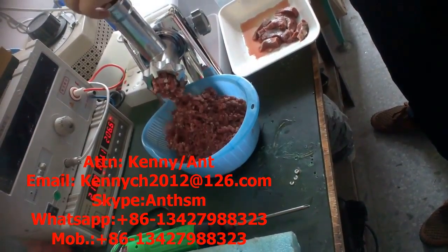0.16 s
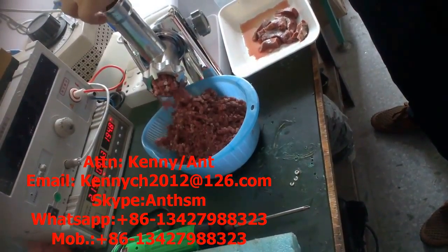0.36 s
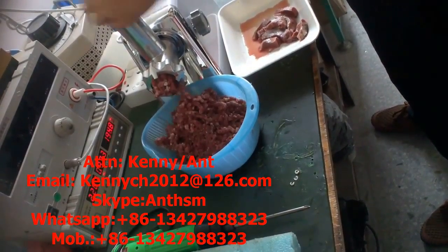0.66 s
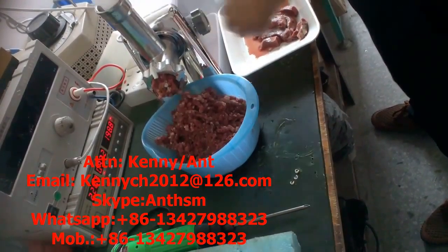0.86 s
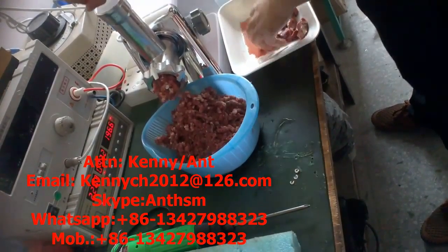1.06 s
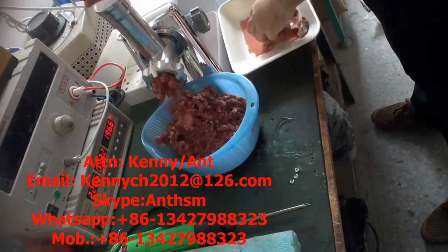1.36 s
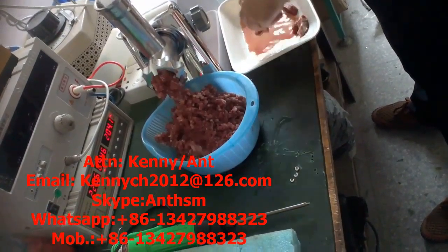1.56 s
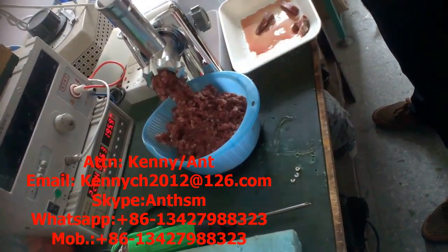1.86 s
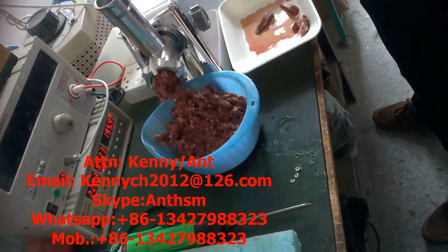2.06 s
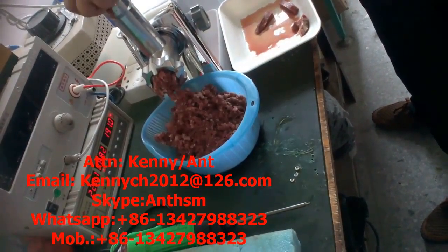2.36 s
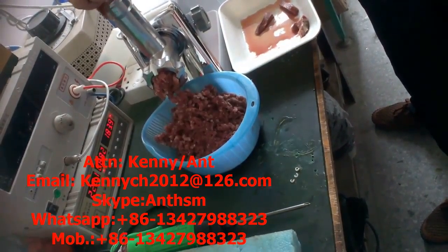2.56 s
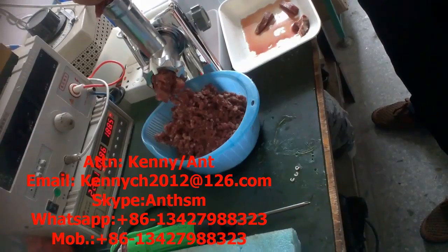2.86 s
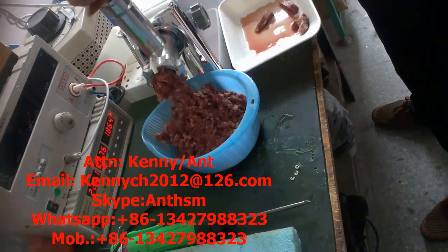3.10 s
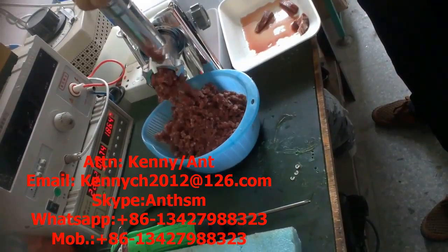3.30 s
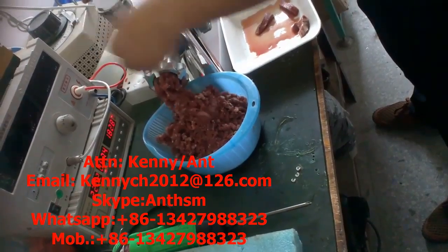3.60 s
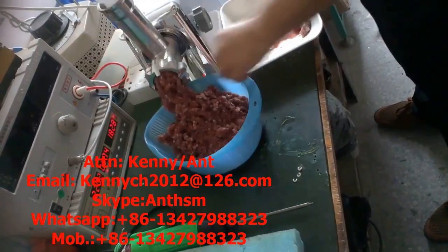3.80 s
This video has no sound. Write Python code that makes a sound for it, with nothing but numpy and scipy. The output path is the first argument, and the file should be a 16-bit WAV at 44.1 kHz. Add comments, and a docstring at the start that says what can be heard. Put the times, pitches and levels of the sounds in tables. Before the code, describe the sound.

An electric meat grinder drones and whirs steadily up close, with buzzy gear whine and metallic rattle.

```python
"""An electric meat grinder runs close to a small mono microphone in a workshop.
The motor speed sags and recovers with the load; shaft, gear and armature tones with sidebands ride on it.
Random tooth impacts ring the housing as rattle; decaying rings and noise bursts make ticks, plops, thuds
and thumps, and one double snap cracks. Filtered noise gives casing rumble and fan hiss, over mains hum."""
import sys
import numpy as np
from scipy import signal
from scipy.fft import rfft, irfft
from scipy.io import wavfile
from scipy.ndimage import uniform_filter1d

SR = 44100
rng = np.random.default_rng(int(sys.argv[2]) if len(sys.argv) > 2 else 0)


def log_audio(samples):
    """Write samples as a 16-bit WAV file to the path given in sys.argv[1]."""
    # one column per channel
    frames = np.atleast_2d(samples).T
    # limit to full scale, then quantise
    limited = np.clip(frames, -1, 1)
    pcm = np.round(limited * 32767).astype(np.int16)
    wavfile.write(sys.argv[1], SR, pcm)


def natural_amplitude(level_db):
    """Convert a level in decibels to a linear amplitude factor, elementwise."""
    exponent = np.asarray(level_db, float) / 20
    return 10 ** exponent


N = 173754

PINION_TEETH, WHEEL_TEETH = 7, 54
WHEEL_RATIO = PINION_TEETH / WHEEL_TEETH  # wheel turns per shaft turn
MAINS_HZ = 50
WHEEL_THROB_DB = 2  # throb once a wheel turn


def col(table, k):
    """Column k of a curve table at every sample."""
    a = np.array(table, float)
    return np.interp(np.arange(N) / SR, a[:, 0], a[:, k])


def walk(rate):
    """Smooth random wander, about rate turns a second, spread 1."""
    k = np.arange(int(N / SR * rate) + 3)
    steps = np.interp(np.arange(N) * rate / SR, k, rng.standard_normal(len(k)))
    w = uniform_filter1d(steps, int(SR / rate))
    return w / w.std()


def tone(turns, db, wobble_db, blur=0.28):
    """A sine on a running count of turns, wavering and fluttering in level, blurred in phase (radians)."""
    wobble = 0.76 * walk(8.99) + 0.8 * walk(23.965)
    level = np.sqrt(2) * natural_amplitude(db + wobble_db * wobble)
    return level * np.sin(2 * np.pi * (turns + rng.random()) + blur * walk(30))


def ring(x, hz, width):
    """Two-pole resonance, gain 1 at the centre."""
    return signal.lfilter(*signal.iirpeak(hz, hz / width, SR), x)


def strikes(table, ring_db, spray_db, rise_s, spread):
    """Each row: a decaying ring at its pitch with a spray of noise around it."""
    out, t = np.zeros(N + SR), np.arange(SR // 3) / SR
    for s, db, hz, t60 in table:
        fall = np.exp(-np.log(1000) * t / t60) * np.minimum(t / rise_s, 1)
        spray = ring(ring(rng.standard_normal(len(t)), hz, spread * hz), hz, spread * hz)
        body = natural_amplitude(ring_db) * np.sin(2 * np.pi * hz * t) + natural_amplitude(spray_db) * spray / spray.std()
        i = int(s * SR)
        out[i:i + len(t)] += natural_amplitude(db) * fall * body
    return out[:N]


# Motor speed under load. Each row: time in seconds, shaft speed in Hz.
MOTOR_SPEED = [(0, 202), (.12, 203), (.23, 206.8), (.33, 205), (.46, 201.8), (.6, 202.1), (.8, 203.6),
               (.93, 204.1), (1.05, 203.3), (1.25, 203), (1.39, 198.3), (1.5, 193.4), (1.56, 194),
               (1.65, 198.5), (1.76, 203), (1.86, 203.6), (1.97, 201.7), (2.08, 204), (2.2, 209.5),
               (2.32, 211.8), (2.43, 210), (2.55, 206.4), (2.67, 207.7), (2.79, 210.5), (3.0, 210),
               (3.13, 210.2), (3.25, 211.7), (3.33, 213.7), (3.5, 213.2), (3.7, 214.4), (3.83, 213.3),
               (3.94, 213)]


def shaft_turns():
    """Running count of shaft turns: the motor speed, smoothed by its inertia, summed over time."""
    return np.cumsum(uniform_filter1d(col(MOTOR_SPEED, 1), SR // 25)) / SR


# Unbalance and tooth-error tones. Each row: multiple of shaft speed, level in dB.
SHAFT_TONES = [(3, -64.5), (4, -63), (5, -68.5), (6, -57.5), (8, -54), (9, -71), (10, -67), (11, -65),
               (13, -67), (42, -58.5)]


def shaft_whine(shaft):
    """Unbalance and tooth errors repeat with the shaft, sounding at its multiples; high ones blur more."""
    return sum(tone(k * shaft, db, wobble_db=3.5, blur=0.073 * k) for k, db in SHAFT_TONES)


# Pinion mesh tone. Each row: time in seconds, level in dB before beat and throb.
MESH_LEVEL = [(0, -43.5), (.2, -40), (.5, -39.5), (.8, -41.5), (1.05, -43), (1.2, -36), (1.28, -32.5),
              (1.35, -36.5), (1.41, -31.5), (1.46, -37), (1.49, -46), (1.58, -46), (1.65, -45.5),
              (1.72, -37.5), (1.79, -47.5), (1.9, -36), (2.05, -41.5), (2.25, -43.5), (2.36, -47),
              (2.43, -37.5), (2.5, -47.5), (2.55, -41), (2.7, -43.5), (2.8, -45.5), (3.0, -43.5),
              (3.15, -51.5), (3.25, -42), (3.31, -54), (3.45, -42), (3.6, -51), (3.68, -43), (3.77, -38),
              (3.85, -51), (3.9, -39.5), (3.94, -31)]
# Sidebands of the mesh tone. Each row: wheel turns off the tone, level in dB against it.
MESH_SIDEBANDS = [(-2, -22), (-1, -11.5), (1, -9.5), (1.8, -17.5)]
# Common level of the mesh overtones. Each row: time in seconds, level in dB.
OVERTONE_LEVEL = [(0, -54.5), (.15, -57), (.35, -57), (.6, -53.5), (.72, -64), (.9, -54), (1.3, -54.5),
                  (1.5, -57), (1.75, -55.5), (2.05, -52), (2.3, -59), (2.45, -59), (2.6, -58), (2.75, -52),
                  (2.83, -64), (2.92, -59), (3.1, -50.5), (3.2, -65), (3.28, -59), (3.5, -59), (3.63, -60),
                  (3.75, -59.5), (3.94, -60)]
# Mesh overtones. Each row: multiple of the mesh tone, wheel turns off it, dB against the common level.
MESH_MULTIPLES = [(2, -1, -7.5), (2, 0, -1), (2, 0.98, -10.5)]


def gear_mesh(shaft):
    """Each pinion tooth meeting the wheel makes a cycle; the wheel's turning adds sidebands and throb."""
    wheel, mesh = shaft * WHEEL_RATIO, PINION_TEETH * shaft
    beat_turns, beat_depth_db = .0395, 2  # slow beat, turns per shaft turn
    beat_db = beat_depth_db * np.sin(2 * np.pi * (beat_turns * shaft - .13))
    beat_db = beat_db + WHEEL_THROB_DB * np.sin(2 * np.pi * wheel + 0.61 * walk(5.03))
    mesh_db, overtone_db = col(MESH_LEVEL, 1), col(OVERTONE_LEVEL, 1)
    out = tone(mesh, mesh_db + beat_db, wobble_db=3.0)
    for k, db in MESH_SIDEBANDS:
        out += tone(mesh + k * wheel, mesh_db + db + 0.17 * beat_db, wobble_db=5.0)
    for m, k, db in MESH_MULTIPLES:
        out += tone(m * mesh + k * wheel, overtone_db + db, wobble_db=3.5, blur=0.47 * m)
    return out


# Second gear stage. Each row: multiple of wheel speed, level in dB below the casing's limit.
STAGE_TONES = [(14, -59), (15, -55), (16, -54), (17, -47), (18, -47), (19, -48.5), (20, -83)]


def second_stage(shaft):
    """Multiples of the wheel speed, fading above the pitch where the casing stops carrying them."""
    top_hz, fall_db_per_hz = 516, 0.9
    wheel, wheel_hz = shaft * WHEEL_RATIO, col(MOTOR_SPEED, 1) * WHEEL_RATIO
    out = 0
    for k, db in STAGE_TONES:
        loss_db = fall_db_per_hz * np.maximum(k * wheel_hz - top_hz, 0)
        out = out + tone(k * wheel, db - loss_db, wobble_db=1.5, blur=0.2)
    return out


# Armature slot tones. Each row: time in seconds, slot tone in dB, its third multiple in dB,
# its fourth multiple in dB, sidebands in dB against the tone.
SLOT_LEVELS = [(0, -65, -59, -64, -2), (.15, -56, -65, -62, -4), (.3, -56.5, -54, -58, -2),
               (.5, -56, -64, -60, -3), (.75, -55.5, -70, -68, -2), (.88, -52.5, -66, -63, 4.5),
               (1.05, -56, -62, -60, -6), (1.25, -54, -64, -63, -3.5), (1.38, -61, -64, -56, 0),
               (1.5, -68, -62, -52, 4), (1.65, -63, -66, -56, -3), (1.75, -52, -68, -60, -0.5),
               (1.9, -56.5, -65, -60, 1), (2.1, -59.5, -58, -63, 7), (2.33, -54.5, -52, -62, -9),
               (2.5, -57, -54, -57, 0), (2.7, -53, -55.5, -66, -1), (2.8, -62, -57, -58, -3),
               (2.95, -59, -62, -54, -4), (3.1, -59, -60, -63, 5), (3.2, -60, -55, -68, -2),
               (3.3, -53.5, -48, -59, -7), (3.6, -54, -48, -59, -6), (3.73, -63, -51, -60, -2),
               (3.8, -57, -52, -59, 3), (3.94, -55, -54, -66, -5)]
# The tone and its sidebands; the field pulses twice a mains cycle.
# Each row: mains cycles off the slot tone, level in dB against it.
SLOT_SIDEBANDS = [(-4, -13), (-2, -5), (0, 0), (2, -3)]
# Casing panels lift a slot tone that glides through them. Each row: centre in Hz, width in Hz, lift in dB.
CASING_PANELS = [(2550, 80, 6)]


def armature_slots(shaft):
    """Slots passing the pulsing field give a tone, its multiples and mains-spaced sidebands."""
    slots = 12
    mains = MAINS_HZ * np.arange(N) / SR
    out = 0
    for n, order in enumerate((slots, 3 * slots, 4 * slots)):
        for k, side_db in SLOT_SIDEBANDS:
            hz = order * col(MOTOR_SPEED, 1) + k * MAINS_HZ
            lift_db = sum(g / (1 + (2 * (hz - f) / w) ** 2) for f, w, g in CASING_PANELS)
            db = col(SLOT_LEVELS, 1 + n) + side_db + lift_db
            if k != 0:
                db = db + col(SLOT_LEVELS, 4) - 3 * n  # sidebands weaken on the multiples
            out = out + tone(order * shaft + k * mains, db, wobble_db=2.5, blur=.024 * order)
    return out


# Rings of the gear housing. Each row: centre in Hz, width in Hz, gain in dB against the other rings.
HOUSING_RINGS = [(5850, 2100, -9), (6450, 1660, 8.5), (6880, 480, 15.5), (8000, 360, -2), (8700, 520, 19),
                 (9960, 470, 4), (4160, 600, -23), (2700, 380, -8)]


def rattle(shaft):
    """Dense tooth impacts of uneven size, bunching once a beat, ring the housing."""
    hits_per_s, level_db = 1400, -50
    scatter_db, beat_turns = 2.5, .112  # beats per shaft turn
    size_db = scatter_db * np.minimum(rng.exponential(1, N), 5.5)
    hits = (rng.random(N) < hits_per_s / SR) * rng.choice([-1, 1], N) * natural_amplitude(size_db)
    hits *= 1 + np.sin(2 * np.pi * beat_turns * shaft + 1.76 * walk(3.03))
    hits *= natural_amplitude(2.2 * walk(12) + 2.2 * walk(40))
    out = sum(natural_amplitude(db) * ring(ring(hits, hz, w), hz, w) for hz, w, db in HOUSING_RINGS)
    return out * natural_amplitude(level_db) / out.std()


# One sharp double snap: start in seconds, level in dB, pitch in Hz, gap between the cracks in seconds.
DOUBLE_SNAP = (.333, -14, 8900, .001)


def snap():
    """Two cracks of a few cycles, the second weaker, and a short fizz."""
    s, db, hz, gap = DOUBLE_SNAP
    t = np.arange(N) / SR - s

    def crack(u, width):
        return np.exp(-(u / width) ** 2) * np.sin(2 * np.pi * hz * u)

    cracks = crack(t, .00016) + .5 * crack(t - gap, .00022)
    fizz = strikes([(s, db - 17, hz, .03)], -30, -.1, .0008, .3)
    return natural_amplitude(db) * cracks + fizz


# Gristle and bone chips at the knife. Each row: start in seconds, level in dB before the ring and
# spray gains, pitch in Hz, 60 dB decay in seconds.
CHIP_TICKS = [(0.0927, -30.5, 6970, 0.06), (0.3797, -31, 7300, 0.06), (0.4742, -22.5, 7240, 0.042),
              (0.5576, -26, 7400, 0.056), (0.595, -21.5, 7360, 0.037), (0.682, -23.5, 7860, 0.047),
              (1.5426, -28.5, 8900, 0.054), (1.8384, -23.5, 7010, 0.049), (1.874, -23, 7400, 0.035),
              (2.044, -26, 8550, 0.045), (2.4299, -30.5, 6880, 0.041), (2.4637, -24.5, 7100, 0.048),
              (2.544, -24, 8500, 0.045), (2.9612, -26.5, 6960, 0.048), (3.0425, -26.5, 7570, 0.06)]


def knife_ticks():
    """Gristle and bone chips snap and rasp: mostly noise sprayed around a high pitch."""
    return strikes(CHIP_TICKS, ring_db=-24, spray_db=-4, rise_s=0.0057, spread=0.26)


# Meat in tube and bowl. Each row: start in seconds, level in dB before the ring and spray gains,
# pitch in Hz, 60 dB decay in seconds.
MEAT_PLOPS = [(.13, -35, 2445, 0.17), (.25, -41, 2500, .1), (1.85, -41, 360, 0.43), (2.73, -40, 1103, .12),
              (3.26, -37, 2440, 0.13), (3.255, -33, 2550, 0.17), (3.525, -32.5, 1052, .08)]


def meat_plops():
    """Short plops of meat: a decaying pitch under a softer spray of noise."""
    return strikes(MEAT_PLOPS, ring_db=-0.16, spray_db=-6.5, rise_s=0.0071, spread=0.22)


# Bites of the screw. Each row: start in seconds, level in dB before the ring and spray gains,
# pitch in Hz, 60 dB decay in seconds.
SCREW_THUDS = [(.25, -38, 493, 0.078), (1.84, -40.5, 455, 0.25), (1.843, -34, 1900, 0.11),
               (3.085, -43, 300, 0.057)]


def screw_thuds():
    """Broad thuds as the screw bites: nearly all wide noise, with a slow rise."""
    return strikes(SCREW_THUDS, ring_db=-32, spray_db=-0.23, rise_s=0.018, spread=1.0)


# Spectrum shape of casing rumble and fan hiss. Each row: frequency in Hz, relative density in dB per Hz.
RUSH_SHAPE = [(15,-90), (25,-44), (100,-47.5), (190,-39.5), (239,-34.5), (272,-21), (343,-14.5),
              (370,-11.5), (410,2), (500,-4), (573,-18), (820,-15), (933,-19.5), (1030,-14), (1340,-11.5),
              (1480,-13.5), (1600,-11), (2470,-19.5), (2950,-25), (3150,-25.5), (3800,-28.5), (4350,-24),
              (4850,-31), (5300,-31), (5700,-19.5), (6100,-23), (6600,-18), (7020,-13.5), (7300,-16.5),
              (7700,-17), (8300,-19.5), (8750,-19.5), (9300,-22), (10200,-25), (10800,-27.5), (11500,-83),
              (22000,-120)]
# Swell of the rumble. Each row: time in seconds, gain in dB.
RUMBLE_SWELL = [(0, -4), (.5, -3.5), (1, -4), (1.5, -4), (2, -3), (2.5, -3), (3, -3), (3.5, -3),
                (3.94, -3.5)]


def rush(shaft):
    """Casing rumble and fan hiss: noise in half-octave bands that swell together and flicker alone."""
    level_db = -38  # of the whole noise, before the band gains
    swell_db, flicker_db, bass_flicker_db = 0.53, 1.5, 4.5
    hz = np.maximum(np.fft.rfftfreq(N, 1 / SR), 1)
    shape = np.array(RUSH_SHAPE, float)
    shape_db = np.interp(np.log(hz), np.log(shape[:, 0]), shape[:, 1])
    spec = rfft(rng.standard_normal(N)) * natural_amplitude(shape_db)
    spec *= natural_amplitude(level_db) / irfft(spec, N).std()
    place = np.clip(2 * np.log2(hz / 100), 0, 14)  # band number, from 100 Hz up
    swell, out = walk(6), 0
    throb = np.sin(2 * np.pi * shaft * WHEEL_RATIO + 0.65 * walk(4.28))
    rumble_db = col(RUMBLE_SWELL, 1) + 0.93 * WHEEL_THROB_DB * throb
    for k in range(15):
        flicker = flicker_db * walk(18) if k > 1 else bass_flicker_db * walk(28)
        db = swell_db * swell + flicker
        if k < 9:  # only the lower bands follow the rumble
            db = db + rumble_db
        out = out + natural_amplitude(db) * irfft(spec * np.clip(1 - abs(place - k), 0, 1), N)
    return out


# Magnetic hum of the stator. Each row: multiple of mains, level in dB before the swell.
HUM_TONES = [(6, -66.5), (8, -43.5)]
# The hum swells with the current drawn. Each row: time in seconds, gain in dB.
CURRENT_SWELL = [(0, -4), (.4, -0.5), (.8, 1), (1.2, -1), (1.55, 3.5), (1.9, -2), (2.4, -1.5), (3, -4.5),
                 (3.5, -0.5), (3.94, -2.5)]


def mains_hum():
    """The stator's magnetic pull sounds at multiples of the mains, swelling with the current."""
    mains = MAINS_HZ * np.arange(N) / SR
    swell_db = col(CURRENT_SWELL, 1)
    return sum(tone(k * mains, db + swell_db, wobble_db=2.0, blur=0.17) for k, db in HUM_TONES)


# Thumps through the bench. Each row: start in seconds, level in dB before the ring and spray gains,
# pitch in Hz, 60 dB decay in seconds.
BENCH_THUMPS = [(.24, -74, 50, .1), (.325, -60, 70, 0.097), (.96, -72, 70, .07), (1.5, -78, 80, .1),
                (1.84, -82, 100, .08), (2.28, -70, 80, .1), (2.67, -76, 60, .08), (3.08, -61, 130, 0.097),
                (3.59, -72, 70, .1), (3.82, -76, 60, 0.076)]


def bench_thumps():
    """Faint low thumps through the bench: wide noise with some ring."""
    return strikes(BENCH_THUMPS, ring_db=-6, spray_db=-.3, rise_s=0.0048, spread=1.1)


def scene():
    """Grinder and meat, one point of sound in two equal channels."""
    shaft = shaft_turns()
    mono = shaft_whine(shaft) + gear_mesh(shaft) + second_stage(shaft) + armature_slots(shaft)
    mono += rattle(shaft) + snap() + knife_ticks() + meat_plops() + screw_thuds()
    mono += rush(shaft) + mains_hum() + bench_thumps()
    return np.array([mono, mono])


def band_limit(x):
    """A steep low-pass at the top of the band."""
    return signal.sosfilt(signal.butter(12, 11690, fs=SR, output="sos"), x)


# Dips in the microphone's response. Each row: centre in Hz, width in Hz.
RESPONSE_DIPS = [(3800, 340), (4900, 1040)]


def record(dry):
    """The microphone dips in the low treble and cuts the top."""
    dip_share = 0.44  # part of the sound removed at a dip's centre
    x = dry
    for hz, width in RESPONSE_DIPS:
        x = x - dip_share * ring(x, hz, width)
    top_cut = signal.cheby2(8, 40, 11900, fs=SR, output="sos")  # 40 dB down from 11.9 kHz
    mix = signal.sosfilt(top_cut, x)
    return band_limit(mix)


dry = scene()
out = record(dry)
log_audio(out)
```